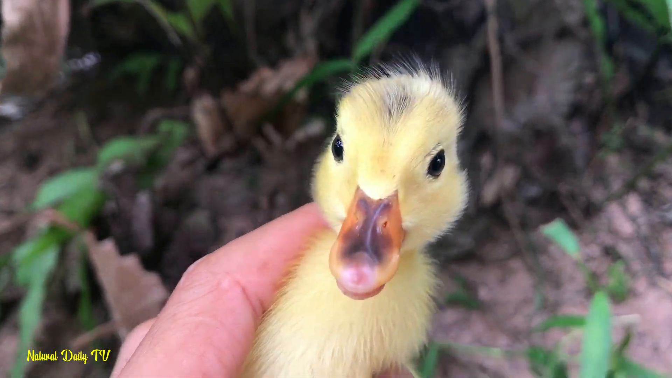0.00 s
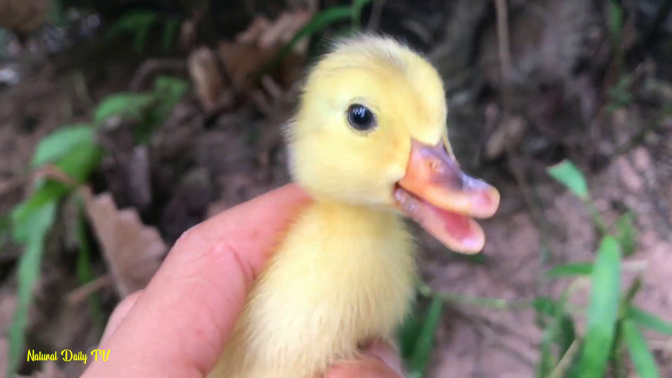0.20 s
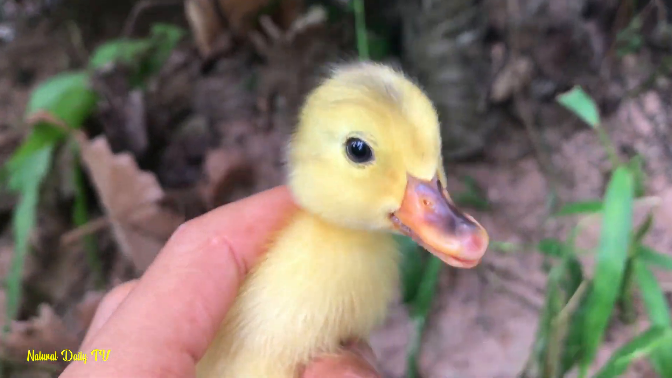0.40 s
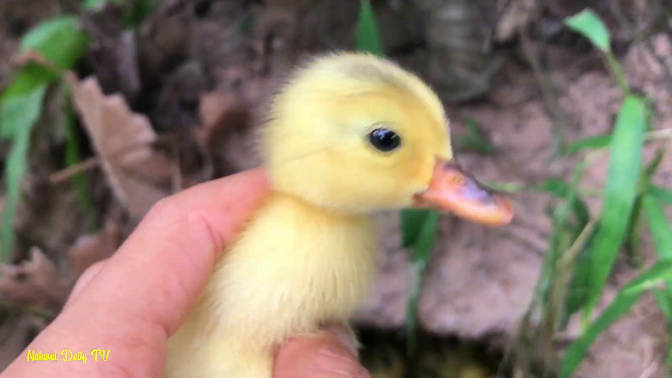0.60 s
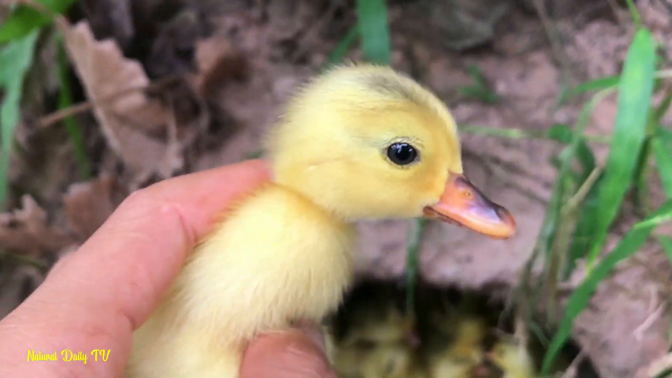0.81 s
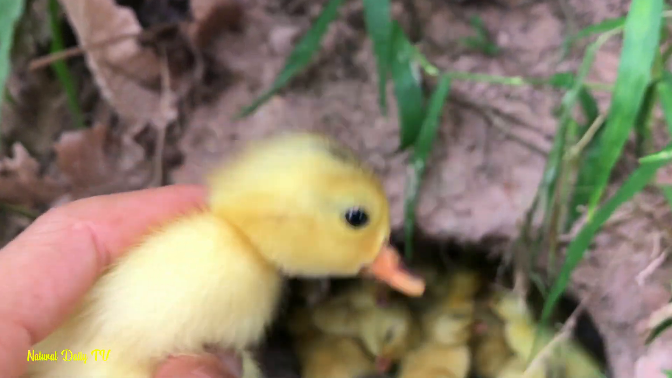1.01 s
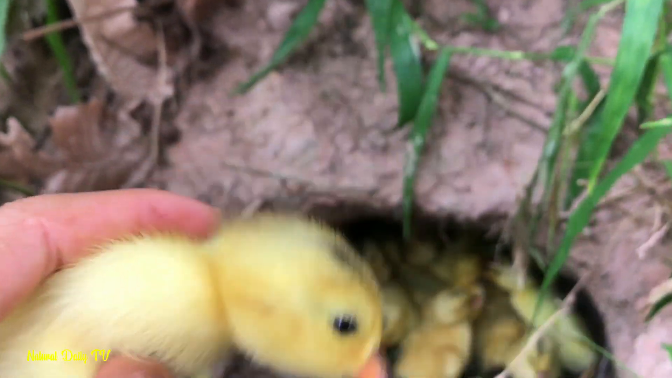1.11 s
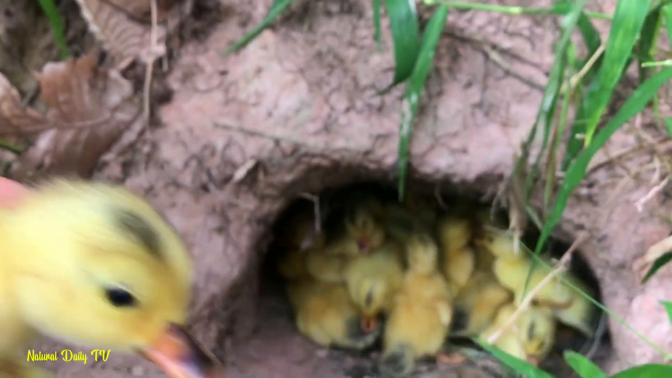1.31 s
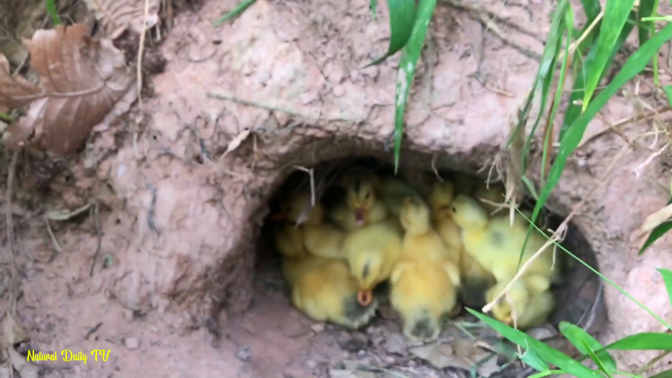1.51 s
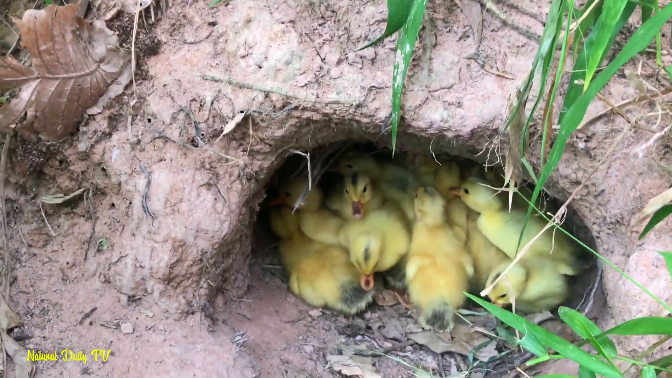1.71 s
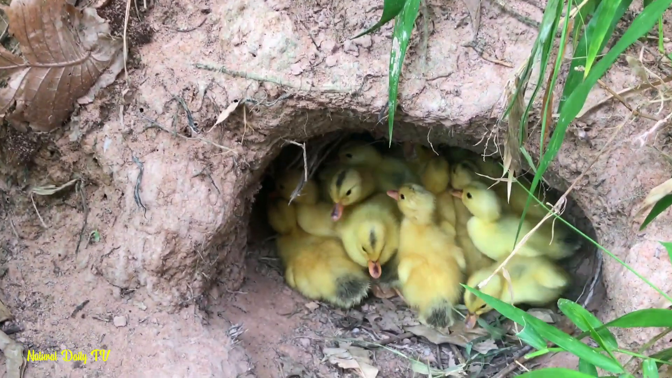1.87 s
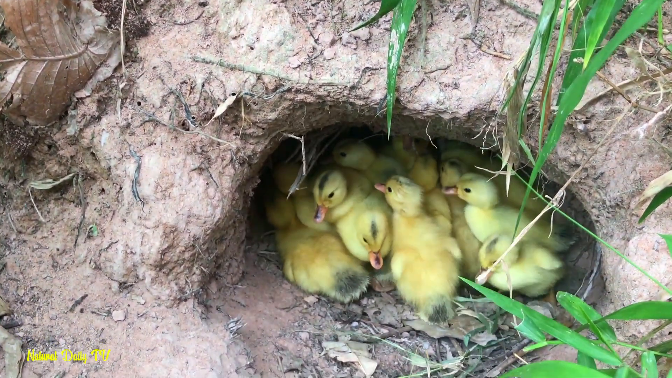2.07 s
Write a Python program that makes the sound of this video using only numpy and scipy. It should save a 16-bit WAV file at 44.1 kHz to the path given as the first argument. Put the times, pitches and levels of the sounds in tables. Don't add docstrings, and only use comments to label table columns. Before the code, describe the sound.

A duckling held close gives one loud, piercing peep almost at once, with a few soft peeps from its brood; then dry leaves rustle, tick and scrape over soil, outdoors, close microphone, faint far birds.

```python
import sys
import numpy as np
from scipy import signal
from scipy.fft import rfft, irfft, next_fast_len
from scipy.io import wavfile
from scipy.ndimage import uniform_filter1d, map_coordinates

SR = 44100
rng = np.random.default_rng(int(sys.argv[2]) if len(sys.argv) > 2 else 0)


def how_loud(loudness_db):
    steps = np.asarray(loudness_db, float) / 20
    return 10 ** steps


def persist_wave(psi):
    counts = np.round(np.clip(psi, -1, 1) * 32767).astype(np.int16)
    wavfile.write(sys.argv[1], SR, np.atleast_2d(counts).T)


N = 92610


def unit(x):
    return x / np.sqrt(np.mean(x ** 2) + 1e-20)


def wobble(rate, size=N):
    return map_coordinates(rng.standard_normal(N // 100), [np.arange(size) * rate / SR])


def coloured(x, points):
    m = next_fast_len(N + 8192)
    f, v = np.transpose(points)
    log_hz = np.log(np.fft.rfftfreq(m, 1 / SR) + 1)
    gain = how_loud(np.interp(log_hz, np.log(f), v))
    return unit(irfft(rfft(x, m) * gain, m)[:N])


def band(x, hz, low, high):
    edges = [low * hz, min(high * hz, 20000)]
    return unit(signal.sosfilt(signal.butter(2, edges, "bandpass", fs=SR, output="sos"), x))


def patchy(x, patchy_db):
    z = signal.stft(x, nperseg=256)[2]
    field = uniform_filter1d(rng.standard_normal(z.shape), 10, 0)
    field = uniform_filter1d(field, 5, 1)
    return signal.istft(z * how_loud(patchy_db * unit(field)), nperseg=256)[1][:N]


def glide(rows, smooth_s):
    s, *cols = np.transpose(rows)
    size = max(int(smooth_s * SR), 1)
    t = np.arange(N) / SR
    return [uniform_filter1d(np.interp(t, s, c), size) for c in cols]


def gate(s, length, edge_s):
    t = np.arange(N) / SR
    return np.clip(np.minimum(t - s, s + length - t) / edge_s, 0, 1) ** 2


def tone(hz, partials_db):
    phase = 2 * np.pi * (np.cumsum(hz) / SR + rng.random())
    partials = (how_loud(db) * np.sin((k + 1) * phase) for k, db in enumerate(partials_db))
    return np.sqrt(2) * sum(partials)


def add(out, s, x):
    part = out[round(s * SR):][:len(x)]
    part += x[:len(part)]


def outdoors():
    # frequency_hz, level_db
    air_spectrum = [(12, -38.5), (20, 5), (76, 2), (162, -10.5), (1020, -23), (2580, -25.5), (2880, -23.5),
                    (3600, -28), (15800, -40)]
    air_db, swell_db = -57, .8
    hum_hz, hum_width_hz, hum_db = 52.7, 5.2, -62
    air = patchy(coloured(rng.standard_normal(N), air_spectrum), patchy_db=2.0)
    hum_spectrum = [(hum_hz - 2.8 * hum_width_hz, -40), (hum_hz, 0), (hum_hz + hum_width_hz, -8), (400, -61)]
    hum = coloured(rng.standard_normal(N), hum_spectrum)
    return how_loud(air_db + swell_db * wobble(11)) * air + how_loud(hum_db) * hum


def far_whistles():
    # start_s, length_s, first_hz, last_hz, level_db
    whistles = [
        (0.0, .1, 2770, 2790, -66),
        (.215, .1, 2650, 2760, -69),
        (.32, .145, 2840, 2910, -65),
        (.645, .065, 2950, 2960, -62),
        (.72, .085, 2950, 2920, -66),
    ]
    flutter_db, waver_hz = 4, 40
    out, t = np.zeros(N), np.arange(N) / SR
    for s, length, first_hz, last_hz, db in whistles:
        hz = np.interp(t, [s, s + length], [first_hz, last_hz])
        hz = hz + waver_hz * (2900 / first_hz) ** 4 * wobble(300)
        level = how_loud(db + flutter_db * wobble(120))
        out += gate(s - .01, length + 0.016, 0.0055) * level * tone(hz, [0])
    return out


def far_hoarse_calls():
    # start_s, length_s, centre_hz, level_db
    hoarse = [
        (.497, .045, 2150, -66),
        (.55, .075, 2200, -67),
        (.65, .075, 2080, -63),
        (.72, .1, 2120, -66),
    ]
    flutter_db, half_width = 4, .075
    out = np.zeros(N)
    for s, length, hz, db in hoarse:
        rasp = band(rng.standard_normal(N), hz, 1 - half_width, 1 + half_width)
        out += gate(s, length, 0.0079) * how_loud(db + flutter_db * wobble(88.2)) * rasp
    return out


def far_clucks():
    # start_s, length_s, pitch_hz, level_db, tilt_db per overtone
    clucks = [
        (.042, .085, 333, -70, 2.2),
        (1.405, .075, 300, -63, -4),
        (1.545, .045, 288, -61, -4),
        (1.585, .035, 295, -66, -2),
    ]
    harmonics_db = [-2, 0, -3, -1]
    out = np.zeros(N)
    for s, length, hz, db, tilt_db in clucks:
        voice = tone(hz * (1 + .006 * wobble(40)), harmonics_db + tilt_db * np.arange(4))
        out += gate(s, length, .015) * how_loud(db + 2.5 * wobble(60)) * voice
    return out


def crackle():
    grains_per_s, spread_db, decay_cycles = 600, 3.5, 4
    draw = rng.random((int(grains_per_s * N / SR), 3))
    hz, t = 2000 * 5.3 ** draw[:, 1:2], np.arange(128)[None] / SR
    size = how_loud(-spread_db * np.log(draw[:, 2:] + 0.033))
    snaps = size * np.sin(2 * np.pi * hz * t) * np.exp(-2 * t * hz / decay_cycles)
    where = (draw[:, :1] * N).astype(int) + np.arange(128)
    return unit(np.bincount(where.ravel(), snaps.ravel(), N + 128)[:N])


def rustle():
    # time_s, level_db
    stirring = [(0.0, -69), (0.13, -78), (0.31, -87), (0.65, -76), (0.81, -59), (0.95, -69), (1.3, -63.5),
                (1.51, -66), (1.64, -72), (1.95, -67), (2.1, -68.5)]
    # frequency_hz, level_db
    leaf_spectrum = [(530, -55), (900, 2), (1450, 0.5), (2320, -17), (3330, -12), (13000, -2), (15800, -13)]
    # start_s, length_s, centre_hz, level_db
    brushes = [(0.185, 0.061, 6000, -57), (0.531, 0.027, 11000, -62.5), (0.589, 0.027, 5260, -56.5),
               (0.8, 0.016, 7000, -60.5), (0.84, 0.04, 3860, -50), (0.94, 0.033, 12000, -60.5),
               (1.025, 0.072, 6950, -57), (1.267, 0.014, 3520, -53), (1.121, 0.013, 9900, -50.5),
               (1.179, 0.048, 6900, -56), (1.347, 0.015, 9200, -60), (1.383, 0.034, 8340, -52),
               (1.457, 0.048, 4970, -59), (1.498, 0.036, 11200, -56), (1.579, 0.09, 8000, -54),
               (1.858, 0.029, 8850, -51.5), (1.875, 0.075, 12000, -57.5), (1.953, .035, 12000, -65)]
    stir_db, = glide(stirring, .004)
    bed = coloured(rng.standard_normal(N), leaf_spectrum) + how_loud(-3) * crackle()
    out = how_loud(stir_db - 1) * patchy(bed, patchy_db=1.0)
    for s, length, hz, db in brushes:
        u = np.linspace(0, 1, int(length * SR))
        rough = rng.standard_normal(len(u)) * how_loud(3 * wobble(500, size=len(u)))
        swell = np.sin(np.pi * u ** 0.65)
        add(out, s, how_loud(db - 1) * swell * band(rough, hz, 0.11, 2.16))
    return patchy(out, patchy_db=3.5)


def leaf_ticks():
    # start_s, peak_db, centre_hz
    ticks = [(0.031, -48, 9200), (0.4795, -36, 3600), (0.6015, -41, 2800), (0.739, -47, 4600),
             (0.818, -44, 6300), (0.839, -42, 1600), (0.8515, -36, 5900), (0.8544, -38, 6000),
             (0.8563, -40, 2400), (0.8584, -40, 3100), (0.8614, -41, 2800), (0.9332, -44, 1800),
             (1.0238, -45, 6300), (1.0305, -33, 6200), (1.0328, -43, 7700), (1.0395, -45, 6700),
             (1.0429, -38, 6000), (1.0489, -45, 8000), (1.0656, -43, 4500), (1.0743, -43, 1700),
             (1.0768, -37, 1700), (1.1238, -34, 11200), (1.1272, -42, 11500), (1.1302, -44, 11200),
             (1.1326, -44, 11100), (1.1348, -44, 2900), (1.1767, -40, 11500), (1.1909, -42, 3900),
             (1.1931, -40, 6400), (1.195, -44, 9000), (1.1978, -44, 8700), (1.1994, -44, 8600),
             (1.2022, -42, 5500), (1.2648, -48, 3000), (1.2688, -36, 2700), (1.2704, -36, 2300),
             (1.2758, -43, 2600), (1.3573, -45, 11300), (1.3631, -43, 5600), (1.372, -47, 4500),
             (1.3837, -35, 8800), (1.3859, -33, 5900), (1.3895, -40, 3600), (1.391, -35, 11400),
             (1.3924, -42, 5900), (1.394, -38, 13700), (1.3955, -42, 8700), (1.3969, -42, 9500),
             (1.3983, -38, 8700), (1.4016, -41, 1800), (1.4137, -44, 12000), (1.5063, -45, 11200),
             (1.5096, -45, 11000), (1.593, -40, 7700), (1.6143, -43, 9000), (1.6246, -37, 3700),
             (1.642, -43, 4200), (1.6858, -40, 5900), (1.8532, -42, 1700), (1.855, -45, 9200)]
    tick_db, rise_cycles, decay_cycles = 4, .4, 2.1
    after_db, after_s = -12, .002
    out, t = np.zeros(N), np.arange(SR // 30) / SR
    for s, db, hz in ticks:
        envelope = (1 - np.exp(-t * hz / rise_cycles)) * 1.12 * np.exp(-2 * t * hz / decay_cycles)
        snap = how_loud(tick_db) * np.sin(2 * np.pi * hz * t) * envelope
        after = band(rng.standard_normal(len(t)), hz, 0.46, 1.53) * np.exp(-t / after_s)
        add(out, s, how_loud(db) * (snap + how_loud(after_db) * after))
    return out


def soil_scrape():
    # time_s, level_db
    pressure = [(.78, -74), (.83, -66), (.86, -56), (.95, -57), (1.0, -60.5), (1.09, -70), (1.14, -79)]
    # frequency_hz, level_db
    soil_spectrum = [(150, -36), (400, -10.5), (700, 2.5), (1200, -.5), (2200, -4), (3500, -12.5),
                     (6000, -24.5)]
    scrape_db, = glide(pressure, 0.009)
    return how_loud(scrape_db + 2.5 * wobble(300)) * coloured(rng.standard_normal(N), soil_spectrum)


def bumps():
    # start_s, peak_db, pitch_hz
    knocks = [(0.057, -48, 300), (0.306, -42, 400), (.33, -55, 633), (.597, -43, 810), (0.6045, -44.5, 520),
              (0.793, -49.5, 233), (1.0755, -43.5, 750), (1.2695, -43, 900), (1.274, -52, 397),
              (1.8535, -46, 894), (1.857, -40.5, 294)]
    decay_cycles = 3
    out, t = np.zeros(N), np.arange(SR // 10) / SR
    for s, db, hz in knocks:
        ring = np.sin(2 * np.pi * hz * t * np.exp(-30 * t))
        add(out, s, how_loud(db - 0.5) * ring * np.exp(-2 * t * hz / decay_cycles))
    return out


def brood():
    # time as share of length, pitch as ratio to peak, level_db
    short = [(0, .82, -9), (.14, .94, -3), (.32, 1.01, -1), (.6, .92, -.5), (.8, .82, -4), (1, .72, -13)]
    arch = [(0, .66, -14), (.2, .85, -7), (.4, 1.0, -5), (.54, .97, -1), (.68, .83, -3), (.8, .73, -1),
            (1, .64, -4)]
    long_fall = [(0, .64, -19), (.13, .85, -8), (.28, 1.0, -10), (.48, .97, -6), (.57, .87, 1),
                 (.7, .7, -3), (1, .65, -5)]
    # start_s, length_s, peak_hz, level_db
    short_peeps = [
        (.102, .065, 2870, -46.5),
        (.456, .056, 2890, -46),
        (.706, .068, 3070, -49),
    ]
    arch_peeps = [
        (1.558, .112, 3540, -58),
    ]
    long_peeps = [
        (1.797, .125, 3910, -57),
        (2.079, .115, 4300, -45),
    ]
    overtone_db = -32
    out = np.zeros(N)
    for shape, peeps, rough_db in ((short, short_peeps, 1.2), (arch, arch_peeps, 2.8), (long_fall, long_peeps, 3.0)):
        for s, length, peak_hz, db in peeps:
            contour = [(s + u * length, r * peak_hz, db + d) for u, r, d in shape]
            hz, level_db = glide(contour, .006)
            voice = tone(hz + 12 * rough_db * wobble(400), [0, overtone_db])
            out += gate(s, length, 0.0048) * how_loud(level_db + rough_db * wobble(130)) * voice
    return out


def held_duckling():
    # time_s, level_db
    effort = [(.206, -44), (.215, -31), (.226, -24), (.234, -14.5), (.250, -17.5), (.268, -23), (.286, -25),
              (.296, -37), (.314, -42)]
    # time_s, pitch_hz
    pitch = [(.206, 2550), (.213, 3660), (.225, 4230), (.259, 3700), (.271, 3590), (.285, 4060),
             (.297, 4570), (.306, 4300), (.318, 2300)]
    # time_s, level_db
    bill = [(.206, -4), (.226, -11), (.231, -2), (.241, 0), (.266, -1), (.277, 2), (.286, -4), (.3, -8),
            (.312, -3)]
    # time_s, pitch_hz, level_db
    second_path = [(.212, 4600, -62), (.220, 5300, -48), (.229, 5580, -48), (.243, 5220, -49),
                   (.256, 4800, -48), (.268, 4600, -64), (.283, 5300, -56), (.293, 5680, -45),
                   (.306, 5400, -75)]
    overtones_db = [-18, -29.5, -38]
    start_s, end_s = .206, .3165
    stutter_hz, stutter_end_s = 330, .217
    second_blur_hz, breath_db = 85, -54

    t = np.arange(N) / SR
    (hz,), (db,), (bill_db,) = glide(pitch, .007), glide(effort, .003), glide(bill, .002)
    stutter_depth = np.clip((stutter_end_s - t) / .004, 0, .85)
    stutter = 1 - stutter_depth * np.cos(np.pi * stutter_hz * (t - start_s)) ** 2
    extra_db = bill_db + 2.2 * wobble(300)
    partials_db = [0, *(o + extra_db for o in overtones_db)]
    voice = tone(hz + 14 * wobble(500), partials_db) * how_loud(db + .5 * wobble(350)) * stutter

    second_hz, second_db = glide(second_path, .004)
    second = tone(second_hz + second_blur_hz * wobble(430), [0]) * how_loud(second_db + 3 * wobble(300))

    high_db = np.interp(hz, [2500, 3600, 4300], [-12, -6, 2])
    breath_spectrum = [(2500, -22), (4200, 4), (6000, 1.0), (8500, -10.0), (15000, -19.5)]
    breath = coloured(rng.standard_normal(N), breath_spectrum)
    breath = breath * how_loud(breath_db + high_db + 5.9 * wobble(280))
    return gate(start_s, end_s - start_s, 0.0017) * (voice + second + breath)


def earth_echo(near):
    echo_db, t60_s = -36, .07
    tail_size = SR // 5
    tail = rng.standard_normal(tail_size) * how_loud(-60 * np.arange(tail_size) / SR / t60_s)
    return how_loud(echo_db) * signal.fftconvolve(near, tail / np.linalg.norm(tail))[:N]


def scene():
    far = outdoors() + far_whistles() + far_hoarse_calls() + far_clucks()
    handling = rustle() + leaf_ticks() + soil_scrape() + bumps()
    near = brood() + held_duckling()
    return (far + handling + near + earth_echo(near))[None]


def starve(x):
    # centre_s, lowest_hz
    dropouts = [
        (.064, 1500),
        (.155, 3800),
        (.505, 900),
        (.9, 5000),
        (1.225, 300),
        (1.318, 1000),
        (1.875, 4200),
        (2.013, 1200),
    ]
    lost_db, kept_db, kept_share, width_s = -19, 4, .3, .007
    hz, t, z = signal.stft(x, SR, nperseg=512, noverlap=448)
    for s, from_hz in dropouts:
        lost = rng.random(80)[(hz / 340).astype(int)] > kept_share
        change_db = np.where(lost, lost_db, kept_db) * (hz > from_hz)
        z = z * how_loud(change_db[:, None] * np.exp(-((t - s) / width_s) ** 2))
    return signal.istft(z, SR, nperseg=512, noverlap=448)[1][..., :N]


def band_limit(x):
    return signal.sosfilt(signal.butter(12, 15960, fs=SR, output="sos"), x)


def record(dry):
    low_cut_hz, top_hz = 42, 15900
    m = next_fast_len(N + 8192)
    hz = np.fft.rfftfreq(m, 1 / SR)
    response = (hz < top_hz) * hz ** 4 / (hz ** 4 + low_cut_hz ** 4)
    mix = irfft(rfft(starve(dry), m) * response, m)[..., :N]
    return band_limit(mix)


dry = scene()
out = record(dry)
persist_wave(out)
```